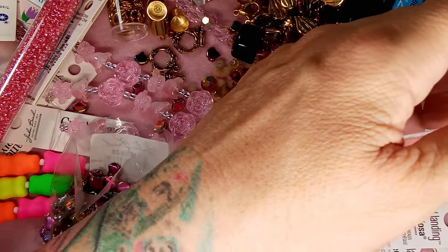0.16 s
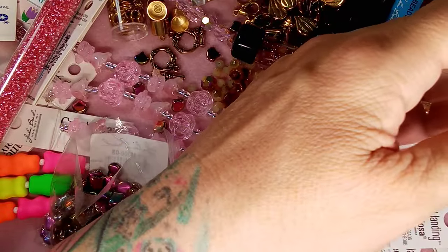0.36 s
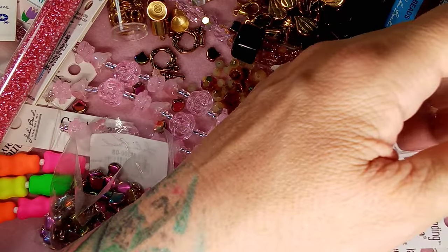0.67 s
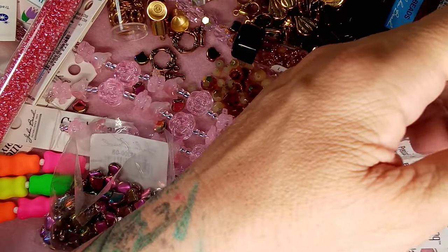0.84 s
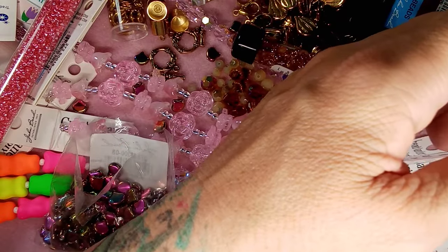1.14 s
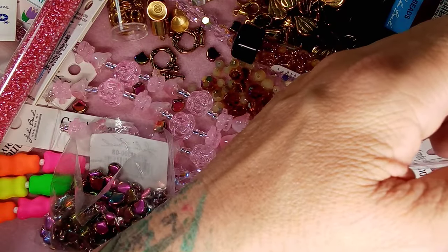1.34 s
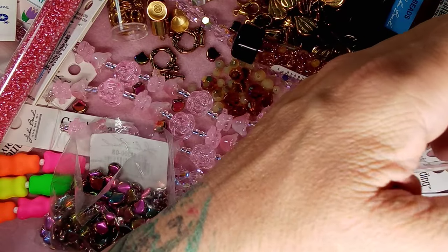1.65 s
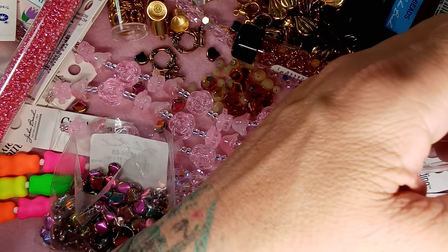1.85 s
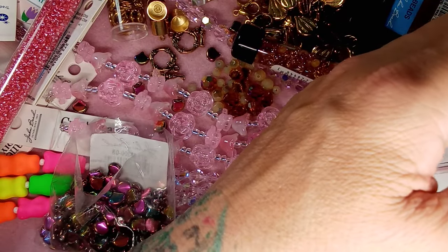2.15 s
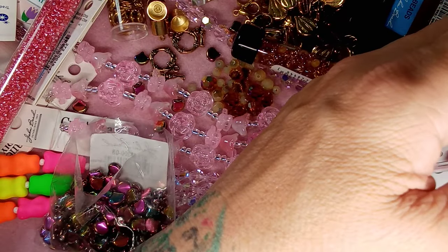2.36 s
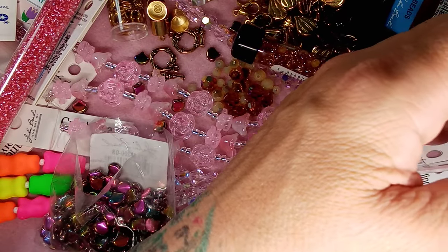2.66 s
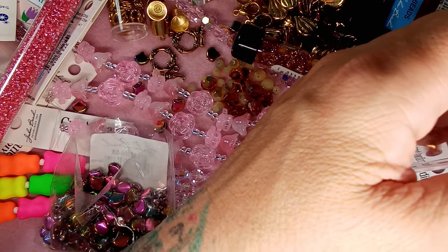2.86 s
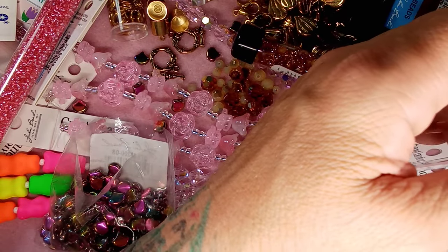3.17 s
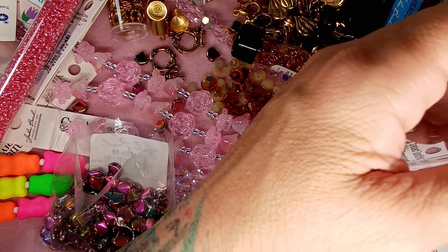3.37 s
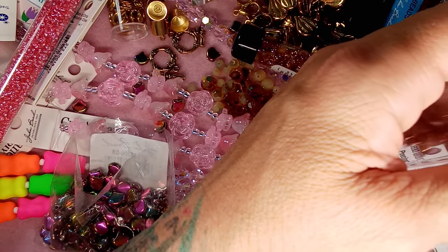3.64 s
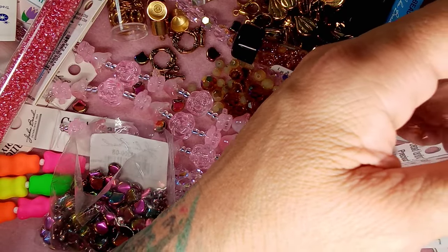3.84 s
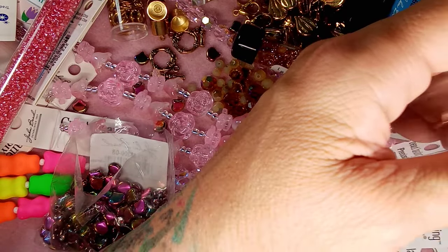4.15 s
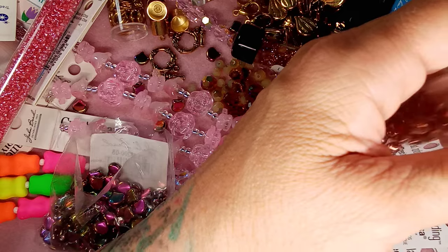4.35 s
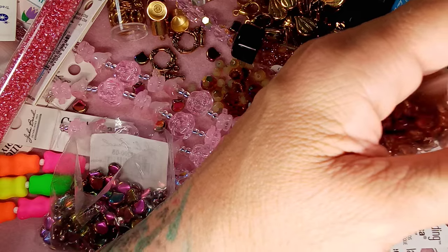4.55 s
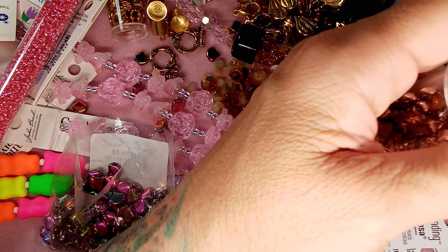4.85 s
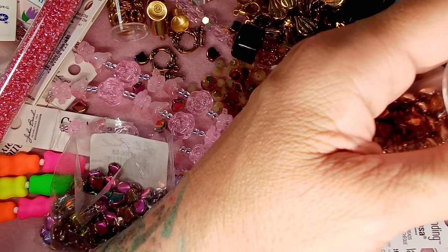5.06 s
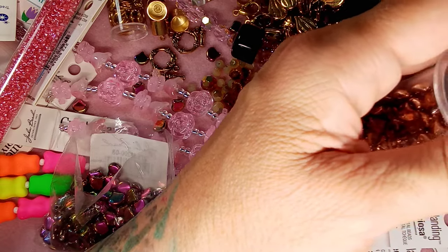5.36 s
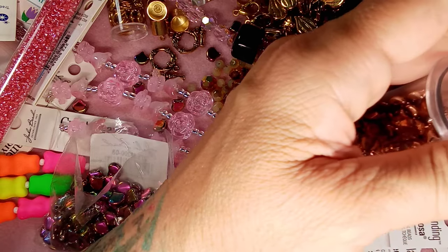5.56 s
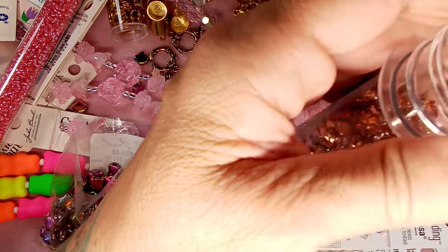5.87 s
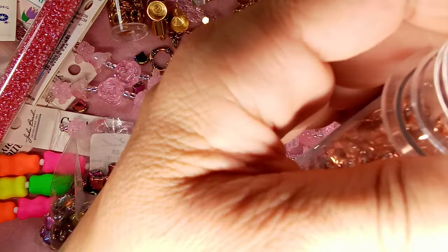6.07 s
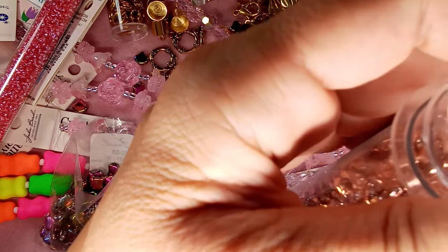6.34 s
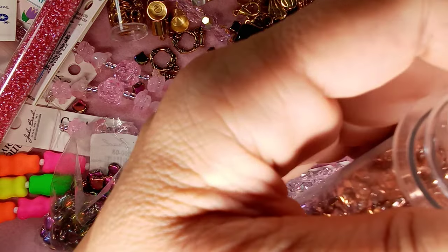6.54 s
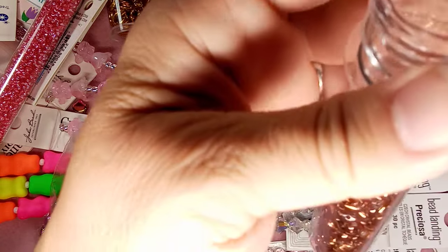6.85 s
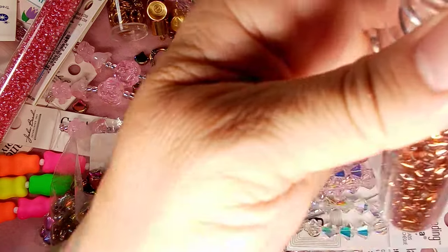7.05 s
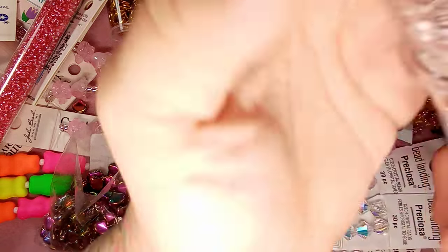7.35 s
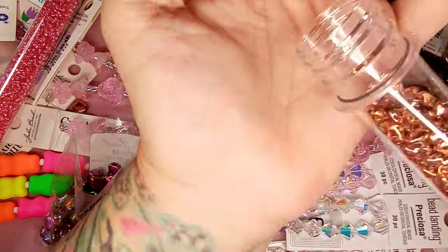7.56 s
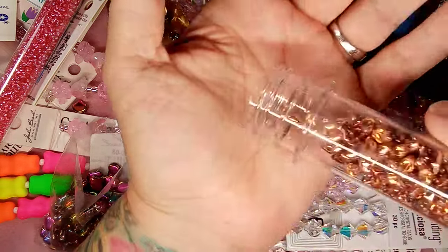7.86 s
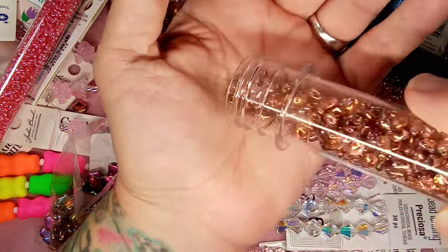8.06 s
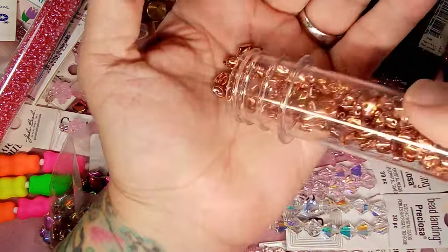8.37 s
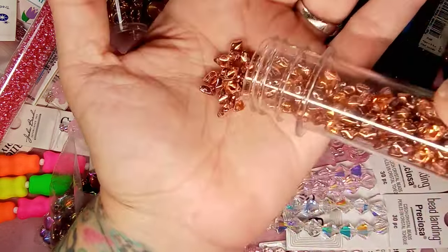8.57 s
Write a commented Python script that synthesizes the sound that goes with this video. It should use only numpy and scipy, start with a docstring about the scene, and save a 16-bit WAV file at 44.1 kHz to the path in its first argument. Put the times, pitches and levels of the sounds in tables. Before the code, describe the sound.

Close to the microphone in a quiet small room, thousands of tiny beads pour into a plastic tube in uneven spurts, hollow and ringing at first, then denser and louder. The stream stops near five seconds. The tube is handled with rustles, damped plastic knocks and faint table bumps, then tipped so beads slide out in light bursts, ending with a soft scrape and thumps.

```python
"""Small glass beads pour from a plastic bag into a plastic tube, close to the microphone: thousands of
tiny random cracks, coloured by the air column of the tube until the beads fill it. The tube is then
handled (rustles and low rings of noise), with damped plastic knocks and low bumps on the work table,
and tilted so that the beads slide out into a palm. Filtered noise makes the quiet air of the room."""
import sys
import numpy as np
from scipy import signal
from scipy.fft import rfft, irfft
from scipy.io import wavfile
from scipy.ndimage import uniform_filter1d

SR = 44100
rng = np.random.default_rng(int(sys.argv[2]) if len(sys.argv) > 2 else 0)


def generate_wav(sig):
    """Save sig (samples, or channels by samples) to the path in sys.argv[1] as 16-bit PCM at SR."""
    pcm = np.round(np.clip(np.atleast_2d(sig).T, -1, 1) * 32767).astype(np.int16)
    wavfile.write(sys.argv[1], SR, pcm)


N = 384111
TIME = np.arange(N) / SR
HZ = np.fft.rfftfreq(4096, 1 / SR)

# The broad colour of rattling beads. Each row: frequency in Hz, level in dB.
RATTLE = [(100, -45), (210, -29), (300, -22.5), (520, -15.5), (1000, -8), (1400, 1.5), (2100, 1), (2800, 2),
          (4100, 1.5), (4600, -8), (5600, -22.5), (6500, -16), (7300, -23), (8200, -43.5)]
# The broad colour of skin that scuffs. Each row: frequency in Hz, level in dB.
SCUFF = [(30, -23.5), (110, -12), (330, -5.5), (600, -8.5), (1300, -17), (2300, -20.5), (5000, -64.5)]
# A resonance of the table. Each row: frequency in Hz, width in Hz, lift in dB.
TABLE_RING = [(343, 50, 12)]
# Resonances of the tube's wall. Each row: frequency in Hz, width in Hz, lift in dB.
TUBE_WALL = [(312, 250, 5), (700, 170, 4.5), (1188, 120, 8.5), (1380, 33, 1.5), (2490, 66, 8.6),
             (2820, 290, 5.8), (3600, 410, 4)]


def gain_of(db):
    """Turns decibels into amplitude."""
    return 10 ** (np.asarray(db) / 20)


def evened(x):
    """Scales a sound to an rms of one."""
    return x / np.sqrt(np.mean(x ** 2) + 1e-24)


def read(points, hz=HZ):
    """Reads a spectrum table along a log-frequency axis."""
    f, value = np.transpose(points)
    return np.interp(np.log(hz + 1), np.log(f + 1), value)


def follow(points):
    """Reads a curve of (seconds, value) sample by sample."""
    s, value = np.transpose(points)
    return np.interp(TIME, s, value)


def during(points):
    """Is one while a curve lasts and zero elsewhere, with soft edges."""
    inside = (TIME >= points[0][0]) & (TIME <= points[-1][0])
    return uniform_filter1d(inside * 1., size=600, mode="constant")


def swells(rows, attack_s, release_s):
    """Makes one envelope for each (start, length, ...) row: attack, hold, release."""
    envelopes = []
    for s, length, *_ in rows:
        rise = np.clip((TIME - s) / attack_s, 0, 1)
        fall = np.exp(-np.clip((TIME - s - length) / release_s, 0, 30))
        envelopes.append(rise * fall)
    return np.array(envelopes)


def add(mix, s, sound):
    """Mixes a sound in at time s."""
    part = mix[max(round(s * SR), 0):][:len(sound)]
    part += sound[:len(part)]


def lift(modes):
    """Draws resonances as humps in dB."""
    return sum(db / (1 + (2 * (HZ - hz) / width) ** 2) for hz, width, db in modes)


def colour(x, db):
    """Filters causally with the given gain: it rings after a blow, never before."""
    log_gain = np.log(gain_of(np.concatenate([db, db[-2:0:-1]])))
    # the minimum-phase response follows from the log gain
    response = np.fft.ifft(np.exp(np.conj(signal.hilbert(log_gain)))).real
    return signal.oaconvolve(x, response)[:len(x)]


def voiced(x, low_db, top_db, usual_top_db=-18):
    """Weighs the hollow low end and the glassy top against the body of a rattle."""
    hz, spectrum = np.fft.rfftfreq(len(x), 1 / SR), rfft(x)
    low = 1 / (1 + (hz / 1000) ** 12)
    mid = 1 / (1 + (hz / 3700) ** 14)
    under_top = 1 / (1 + (hz / 4900) ** 30)
    bands = (low, mid * (1 - low), under_top * (1 - mid), 1 - under_top)
    hollow, body, edge, top = (irfft(spectrum * band, len(x)) for band in bands)
    # soft contacts that lack the top also lose the upper edge of the body
    body = (body + edge * gain_of(top_db - usual_top_db)) / np.std(body + edge)
    return gain_of(low_db) * evened(hollow) + body + gain_of(top_db) * evened(top)


def collisions(rate, spread_db, clump_db, crack_s, ping=0.52, ping_s=0.0024, count=32):
    """Random bead impacts in small avalanches: very short cracks, each with a ping at one of many pitches."""
    clumps = evened(uniform_filter1d(uniform_filter1d(rng.standard_normal(N), size=300), size=200))
    hit = rng.random(N) < np.maximum(rate, 500) / SR
    size = hit * gain_of(spread_db * np.minimum(rng.exponential(1, N), 3) + clump_db * clumps)
    # even out the loudness, so that the level curves alone set it
    size *= rng.choice([-1, 1], N) / np.sqrt(uniform_filter1d(size ** 2, size=1800).clip(1e-4))
    kind, t = rng.integers(0, count, N), np.arange(400) / SR
    pitch = np.linspace(900, 7500, count)[:, None] * rng.uniform(.96, 1.04, (count, 1))
    cracks = rng.standard_normal((count, len(t))) * np.exp(-t / crack_s)
    cracks += ping * np.sin(2 * np.pi * pitch * t) * np.exp(-t / ping_s)
    z = rfft(cracks, 1024)
    # taken together the cracks are white
    white = irfft(z / np.sqrt(np.mean(abs(z) ** 2, 0)))
    cracks = np.roll(white, 32, axis=1)[:, :450]
    return sum(signal.oaconvolve(size * (kind == k), crack)[:N] for k, crack in enumerate(cracks))


def clicks(rows, spectrum, sharpness, crack_db, chatter, chatter_s, bounce, bounce_s, trim_db=0.0):
    """A sharp contact, a brief chatter and a few bouncing beads ring at the pitch of the spot struck."""
    out, t = np.zeros(N), np.arange(4096) / SR
    bounces_per_s = 260
    for s, peak_db, hz, low_db, top_db in rows:
        blow = chatter * rng.standard_normal(len(t)) * np.exp(-t / chatter_s)
        bounces = rng.standard_normal(len(t)) * (rng.random(len(t)) < bounces_per_s / SR)
        blow += bounce * bounces * np.exp(-t / bounce_s)
        blow[0] += 1
        # plastic and packed beads are well damped, so the ring is broad
        detune = sharpness * ((HZ + 1) / hz - hz / (HZ + 1))
        ring_db = 10 * np.log10(1 / (1 + detune ** 2) + gain_of(crack_db) ** 2)
        click = colour(np.roll(blow, 44), read(spectrum) + lift(TABLE_RING) + ring_db)
        click = voiced(click, low_db, top_db)
        add(out, s - .0006, gain_of(peak_db + trim_db) * click / abs(click).max())
    return out


def room_air():
    """The quiet room: steady noise, strongest in the low end."""
    # The colour of the room's air. Each row: frequency in Hz, level in dB.
    air_colour = [(15, -43.5), (25, -20), (101, -3), (172, -7), (230, -8), (392, -12), (431, -15.5),
                  (475, -13), (868, -18.5), (2170, -22), (2390, -24), (2770, -22.5), (8000, -51),
                  (10400, -84), (17600, -120)]
    level_db = -77
    return gain_of(level_db) * evened(colour(rng.standard_normal(N), read(air_colour)))


def room(x, tail_db=-9, build_s=0.0076):
    """Echoes from the table and nearby things, and the short tail of a small room."""
    # How long the room rings. Each row: frequency in Hz, time to fall by 60 dB in seconds.
    ring_times = [(150, 0.24), (350, 0.37), (800, 0.22), (2500, 0.24), (7000, 0.18)]
    # The early echoes. Each row: delay in seconds, level in dB.
    echoes = [(.0019, -31.5), (.0034, -15.5), (.0092, -26), (0.0106, -16), (0.0162, -16), (0.039, -23)]
    hz, t, z = signal.stft(rng.standard_normal(SR // 2), SR, nperseg=256)
    fading = z * gain_of(-60 * t / read(ring_times, hz)[:, None])
    tail = signal.istft(fading, SR, nperseg=256)[1]
    tail *= 1 - np.exp(-np.arange(len(tail)) / SR / build_s)
    tail *= gain_of(tail_db) / np.linalg.norm(tail)
    for delay_s, db in echoes:
        add(tail, delay_s, gain_of([db]))
    return x + signal.fftconvolve(x, tail)[:N]


def bumps(trim_db=-1.0):
    """The heel of the hand pushes the table into a short low ring, with a scuff of skin."""
    # Soft bumps of the hand on the table. Each row: start in seconds, level in dB before the trim,
    # weight of the deep modes in dB, rise time in seconds, scuff in dB relative to the level.
    pushes = [(0.158, -50.5, -30, 0.0077, -17), (0.725, -50.5, -23, 0.0079, -5),
              (1.41, -33, 0.5, 0.0087, -14.5), (1.449, -27.5, 14, 0.0049, -19.5),
              (3.702, -52.5, -17, 0.0045, -1.5), (3.79, -64.5, -1, 0.034, 6.5),
              (6.125, -47, -6, 0.0082, -5.5), (6.385, -53, -14, 0.005, -3),
              (6.554, -49.5, -30, 0.013, -12.5), (6.805, -53, -10, 0.011, -11),
              (6.934, -43.5, 6, 0.0042, -14), (8.415, -38, 4.5, 0.0085, -15),
              (8.472, -34.5, -2.5, 0.0081, -8.5), (8.492, -35.5, 6, 0.0088, -13),
              (8.526, -46.5, 1, 0.015, -8)]
    # How the table rings. Each row: frequency in Hz, level in dB, length relative to the rise time.
    table_modes = [(122.4, -7.5, 1.15), (232, 2.5, 0.99), (337.8, 0.5, 0.92)]
    out, t = np.zeros(N), np.arange(8192) / SR
    hz, db, length = np.transpose(table_modes)[:, :, None]
    for s, level_db, weight_db, rise_s, scuff_db in pushes:
        scuff = evened(colour(rng.standard_normal(len(t)), read(SCUFF)))
        u = t / rise_s
        # a heavy push wakes the deep modes: all but the highest
        shares = gain_of(db + weight_db * (hz < hz.max()))
        swell = u / length * np.exp(1 - u / length)
        ring = (shares * swell * np.sin(2 * np.pi * hz * t)).sum(0) / np.linalg.norm(shares)
        scuffing = gain_of(scuff_db) * u * np.exp(1 - u) * scuff
        add(out, s, gain_of(level_db + trim_db) * (ring + scuffing))
    return out


def rubbing(ring_trim_db=-4.0, rustle_trim_db=-9.0, loose_per_s=160, loose_db=-6.5):
    """Skin creeps over the tube: a fine rustle in its wall, a few loose beads and a low hollow ring."""
    # Fingers shifting their grip. Each row: start in seconds, length in seconds,
    # low ring in dB and rustle in dB, both before their trims.
    rubs = [(5.462, 0.14, -76, -69), (5.752, 0.19, -69, -62.5), (5.953, 0.032, -71, -51.5),
            (6.08, 0.032, -57, -50), (6.3, 0.15, -82, -63), (6.578, 0.22, -64.5, -60),
            (6.787, 0.11, -54.5, -56.5), (6.906, 0.055, -52, -43.5), (7.004, 0.1, -62, -74),
            (7.177, 0.1, -68, -76), (7.484, 0.035, -61, -85), (7.84, 0.035, -64.5, -81)]
    # The broad colour of the rustle. Each row: frequency in Hz, level in dB.
    rustle_colour = [(300, -26), (600, -8.5), (1100, -12.5), (1850, -3), (2400, -6), (3100, -1.5),
                     (4300, -9.5), (5500, -28.5), (7000, -33), (8200, -47.5)]
    # Resonances of the tube as it is gripped. Each row: frequency in Hz, width in Hz, lift in dB.
    gripped = [(1078, 54, 15.5), (1353, 91, 7.5), (2400, 92, 14.5), (3060, 100, 3), (4400, 220, 5)]
    ring_hz, half_width_hz = 342, 30
    ring_gain, rustle_gain = gain_of(np.transpose(rubs)[2:]) @ swells(rubs, attack_s=0.018, release_s=0.022)
    ring_db = -20 * np.log10(1 + ((HZ - ring_hz) / half_width_hz) ** 2)
    ring = evened(colour(rng.standard_normal(N), ring_db))
    # the noise of the skin comes in uneven slips
    unevenness = evened(uniform_filter1d(rng.standard_normal(N), size=250))
    slips = evened(rng.standard_normal(N) * gain_of(3.8 * unevenness))
    loose = evened(rng.standard_normal(N) * (rng.random(N) < loose_per_s / SR))
    rustle = evened(colour(slips + gain_of(loose_db) * loose, read(rustle_colour) + lift(gripped)))
    return gain_of(ring_trim_db) * ring_gain * ring + gain_of(rustle_trim_db) * rustle_gain * rustle


def scrape(start_s=8.471, attack_s=0.003, catch_db=-45.5, catch_decay_s=0.022, drag_db=-57):
    """The open end of the tube catches on the palm, drags on more lightly and rings hollow."""
    # Resonances of the tube's mouth. Each row: frequency in Hz, width in Hz, lift in dB.
    mouth = [(349.4, 36, 16), (710, 97, 3), (910, 150, 6), (1390, 410, 15.5)]
    drag = evened(colour(rng.standard_normal(N), read(SCUFF) + lift(mouth)))
    t = np.maximum(TIME - start_s, 0)
    strength = gain_of(catch_db) * np.exp(-t / catch_decay_s) + gain_of(drag_db)
    return np.minimum(t / attack_s, 1) * strength * drag


def knocks():
    """The plastic tube knocks: short damped rings with a crack and a chatter."""
    # Knocks of the tube. Each row: start in seconds, peak in dB before the trim, ring in Hz,
    # low end in dB and top in dB, both relative to the body of the sound.
    blows = [(5.206, -60, 2290, -9, -28.5), (5.447, -50, 1890, -27, -51), (5.544, -35, 2160, -50, -33),
             (5.874, -46, 2080, -41, -17), (6.024, -30, 1940, -19, -29.5), (6.041, -33.5, 2050, -14, -50),
             (6.06, -38, 1920, -10, -43), (6.204, -26.5, 2820, -26, -30), (6.243, -42.5, 2600, -6.5, -32),
             (6.403, -26, 2830, -11.5, -49.5), (6.51, -52.5, 1870, -27, -48), (6.562, -44, 1760, -29, -26),
             (6.581, -36, 2400, -31, -24), (6.585, -29.5, 2230, -34, -27), (6.594, -31.5, 2000, -18, -26),
             (6.597, -29.5, 2200, -11.5, -27.5), (6.911, -45.5, 3000, -4, -21), (6.933, -39, 755, -5, -33),
             (6.937, -29, 1330, 1.5, -28)]
    # The broad colour of the plastic. Each row: frequency in Hz, level in dB.
    plastic = [(30, -47.5), (80, -25), (300, -16), (800, -5), (1200, -5), (1600, -3.5), (3300, 0),
               (4200, 0.5), (5000, -13.5), (5700, -26.5), (6700, -29.5), (7400, -35), (8200, -73)]
    return clicks(blows, plastic, sharpness=6.7, crack_db=-10.5, chatter=0.13, chatter_s=0.0036,
                  bounce=0.091, bounce_s=0.028, trim_db=2.0)


def ticks(low_db=-23.5):
    """Single beads strike hard, in the stream or as the tube is turned: small bright clicks."""
    # The strikes. Each row: start in seconds, peak in dB, ring in Hz,
    # top in dB relative to the body of the sound.
    hard_beads = [(0.034, -33.5, 3240, -60), (0.047, -35, 3120, -44), (0.13, -36, 3120, -45),
                  (0.158, -40, 3100, -39), (0.4624, -38.5, 2740, -15), (0.621, -37.5, 2900, -11),
                  (0.7426, -38, 2740, -16), (0.8166, -35, 2660, -17.5), (0.921, -32.5, 2970, -19),
                  (1.027, -34.5, 2660, -20), (1.4306, -32, 2600, -22), (1.5826, -34, 3030, -15),
                  (1.616, -35.5, 4120, -10), (1.668, -31.5, 4040, -19), (1.865, -34.5, 3920, -16),
                  (1.899, -30.5, 4030, -22), (2.4085, -38, 3830, -22.5), (2.461, -37, 2580, -15),
                  (2.5404, -33, 4000, -11), (4.8157, -32.5, 3790, -24.5), (4.867, -43, 3720, -5),
                  (4.907, -39.5, 3600, -12.5), (6.837, -50.5, 2380, -18), (7.095, -59, 4710, -5),
                  (7.112, -54, 3600, -6), (7.123, -58, 3900, -5), (7.244, -44.5, 3880, 3.5),
                  (7.3391, -46, 4020, -3), (7.3554, -56.5, 3800, -15), (7.5026, -45, 3460, 0),
                  (7.9034, -37, 3660, -15), (8.0225, -39, 2880, -16), (8.106, -37.5, 2630, -21),
                  (8.682, -47, 3960, -15)]
    strikes = [(s, peak_db, hz, low_db, top_db) for s, peak_db, hz, top_db in hard_beads]
    return clicks(strikes, RATTLE, sharpness=4.0, crack_db=-12.5, chatter=.14, chatter_s=0.0024,
                  bounce=0.24, bounce_s=0.016)


def slide(trim_db=-2.0, per_s=1300, low_db=-25, top_db=-17):
    """Beads roll over each other along the tilted tube: a lighter rattle with less low end."""
    # Beads shifting as the tube is turned over, then sliding out.
    # Each row: time in seconds, level in dB before the trim.
    slide_levels = [(7.44, -78), (7.48, -71), (7.52, -53.5), (7.55, -49), (7.61, -66.5), (7.79, -73.5),
                    (7.83, -64), (7.89, -62), (7.92, -54), (8.12, -48), (8.2, -54.5), (8.26, -55),
                    (8.31, -49), (8.38, -55.5), (8.57, -52), (8.64, -61.5), (8.71, -64.5)]
    # The broad colour of sliding beads. Each row: frequency in Hz, level in dB.
    sliding = [(120, -36), (330, -18.5), (520, -33.5), (680, -6), (1000, -11), (1450, -3.5), (1900, -13),
               (2700, 1.5), (4150, 3.5), (4700, -7), (5600, -20.5), (6500, -15), (7300, -18), (8200, -44)]
    beads = collisions(per_s, spread_db=-1.0, clump_db=-1.5, crack_s=0.00024)
    rattle = colour(beads, read(sliding) + lift(TABLE_RING) + lift(TUBE_WALL))
    return during(slide_levels) * gain_of(follow(slide_levels) + trim_db) * voiced(rattle, low_db, top_db)


def pour(trim_db=-1.5):
    """Beads rain into the tube; the ring of its air column gives way to that of its wall as it fills."""
    # The stream of beads. Each row: time in seconds, level in dB before gushes and trim.
    stream = [(0, -57.5), (0.04, -46), (0.37, -51), (0.55, -48.5), (0.72, -56), (0.85, -54.5),
              (1.01, -48.5), (1.24, -56.5), (1.42, -51.5), (1.56, -53), (1.94, -46.5), (2.29, -48),
              (2.43, -61.5), (2.5, -54), (2.88, -42), (3.16, -42), (3.9, -41), (4.26, -48), (4.47, -38),
              (4.61, -39.5), (4.89, -54.5), (5.05, -99)]
    # Clumps of beads that drop to the bottom at once. Each row: start in seconds, length in seconds,
    # extra level in dB, extra low end in dB.
    gushes = [(0.121, 0.27, 0.5, 9), (0.475, 0.11, 0.5, 13.5), (0.618, 0.03, 1.5, 4),
              (0.731, 0.025, 5.5, 9), (0.918, 0.017, 1, 7.5), (0.95, 0.19, -1.5, 4),
              (1.31, 0.17, 0.5, 10.5), (1.726, 0.043, 1, 7), (1.869, 0.058, 1, 8.5), (2.148, 0.094, 0.5, 8),
              (2.444, 0.37, 1, 4.5), (2.85, 0.13, 0, 6), (3.228, 0.093, 1.5, 4.5), (3.64, 0.24, 1, 2.5),
              (4.35, 0.4, 0, 2.5)]
    # How empty the tube is. Each row: time in seconds, share of the air column that still rings.
    emptiness = [(0, 1), (2.3, 0.78), (2.9, 0.66), (3.6, 0.58), (4.1, 0.38), (4.35, 0.016)]
    # The glassy top. Each row: time in seconds, level in dB relative to the body of the sound.
    glassy = [(0, -37.5), (0.44, -37), (0.47, -30), (0.57, -36), (0.63, -28), (1.22, -16.5), (1.3, -30),
              (1.41, -32), (1.54, -17), (2.35, -17.5), (2.9, -19.5), (4.75, -15.5), (4.95, -8)]
    # Resonances of the empty tube. Each row: frequency in Hz, width in Hz, lift in dB.
    air_column = [(615.3, 62, 20.5), (950, 200, -2), (1720, 370, 7), (2865, 170, 5.5), (3993, 250, 12),
                  (5100, 590, 9.5)]
    # Resonances of the half-filled tube. Each row: frequency in Hz, width in Hz, lift in dB.
    half_full = [(506, 83, 1.5), (689, 80, 11), (760, 56, 2), (1187, 100, 4.5), (1690, 140, 2),
                 (2570, 160, 6.5), (2840, 160, 6), (3646, 250, 7.5)]

    stream_db = follow(stream)
    gush_db, gush_low_db = np.transpose(gushes)[2:] @ swells(gushes, attack_s=0.014, release_s=0.014)
    # a louder stream is denser and hollower: 2000 collisions a second at -45 dB, doubling every 5.5 dB
    louder_db = stream_db + 45
    rate = 2000 * 2 ** (louder_db / 5.5)
    low_db = -14.5 + 0.18 * louder_db + gush_low_db

    empty = np.clip(follow(emptiness), 0, 1)
    beads = collisions(rate, spread_db=2.5, clump_db=0.82, crack_s=0.00051)
    body = read(RATTLE) + lift(TABLE_RING)
    rattle = np.zeros(N)
    # fade from one set of resonances to the next
    for stage, modes in [(0.97, air_column), (0.493, half_full), (0.006, TUBE_WALL)]:
        share = np.maximum(1 - 2 * abs(empty - stage), 0)
        rattle += share * colour(beads, body + lift(modes))
    level = during(stream) * gain_of(stream_db + gush_db + trim_db)
    return level * voiced(rattle, low_db, follow(glassy))


def scene():
    """Beads, tube and hands in a quiet room."""
    handling = bumps() + rubbing() + scrape() + knocks()
    beads = ticks() + slide() + pour()
    return (room(handling + beads) + room_air())[None]


def record(dry, edge_hz=8200):
    """The narrow band of the microphone: nothing much above its edge gets through."""
    eased = dry * signal.windows.tukey(N, .001)  # soft start and end
    band = signal.firwin(401, edge_hz, window=("kaiser", 8), fs=SR)
    return signal.oaconvolve(eased, band[None], "same")


dry = scene()
out = record(dry)
generate_wav(out)
```